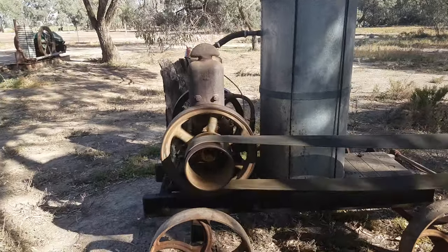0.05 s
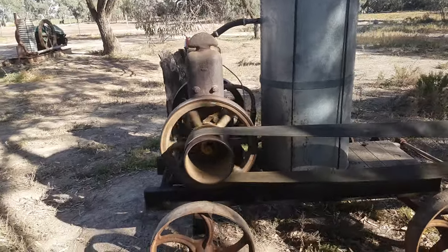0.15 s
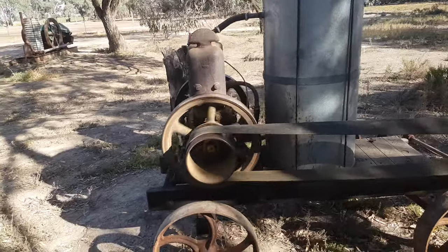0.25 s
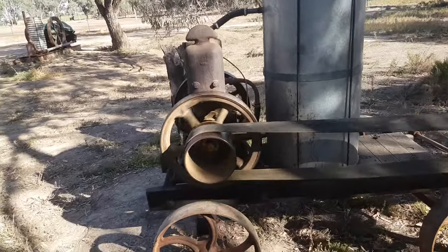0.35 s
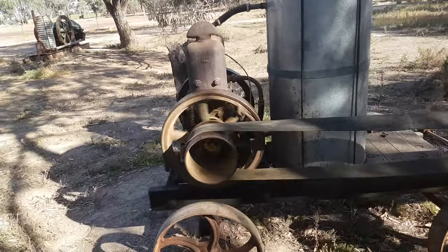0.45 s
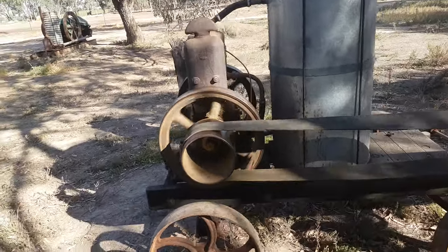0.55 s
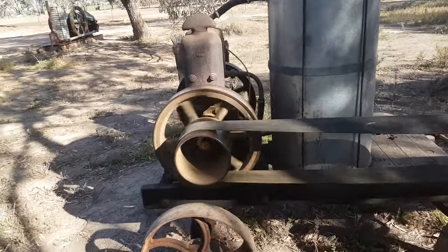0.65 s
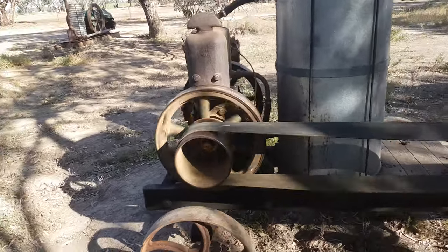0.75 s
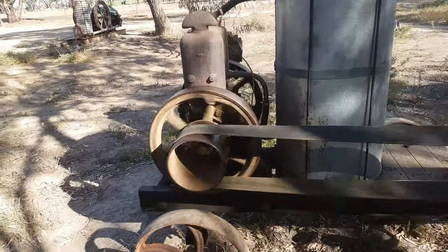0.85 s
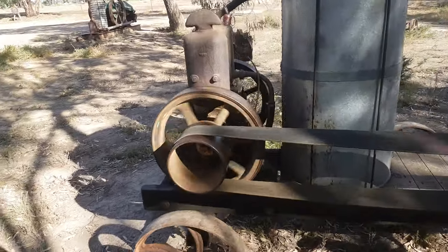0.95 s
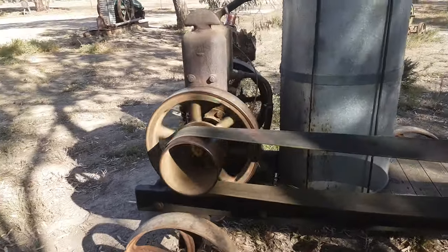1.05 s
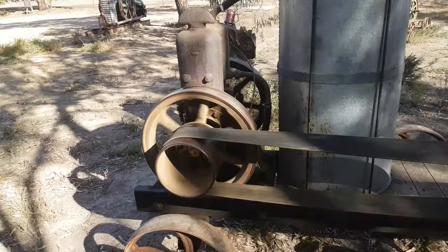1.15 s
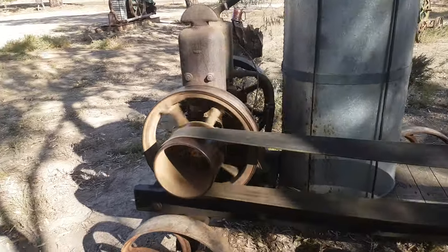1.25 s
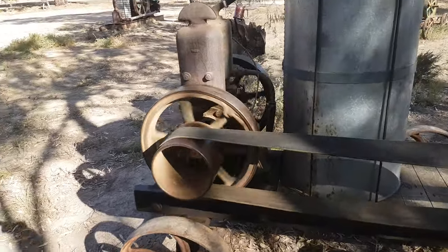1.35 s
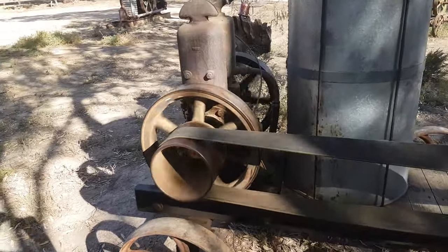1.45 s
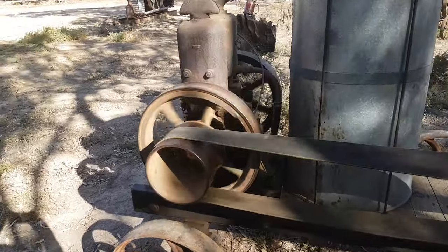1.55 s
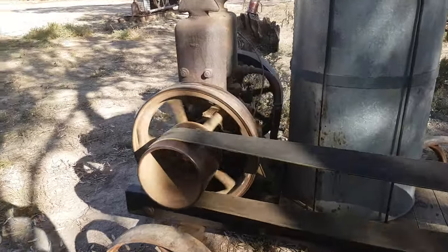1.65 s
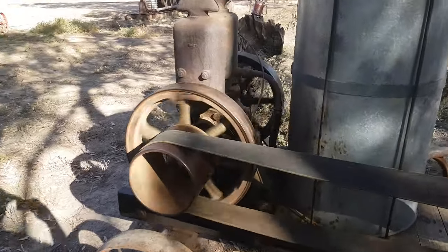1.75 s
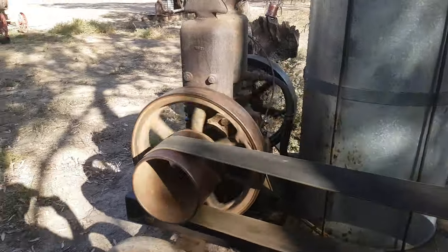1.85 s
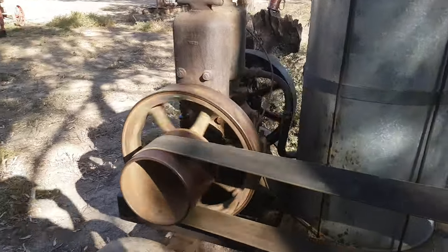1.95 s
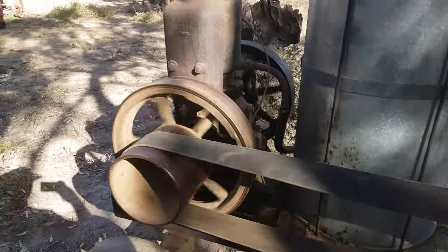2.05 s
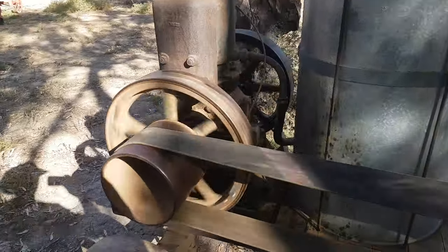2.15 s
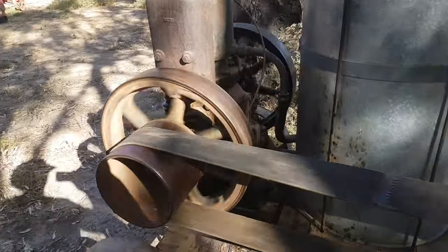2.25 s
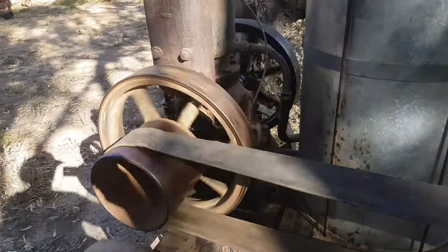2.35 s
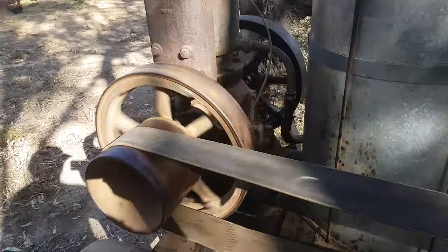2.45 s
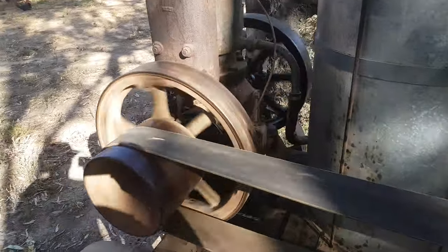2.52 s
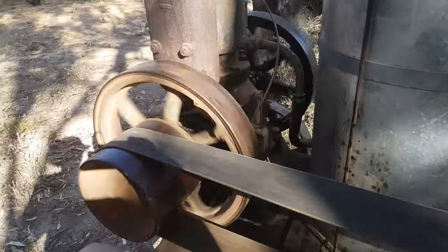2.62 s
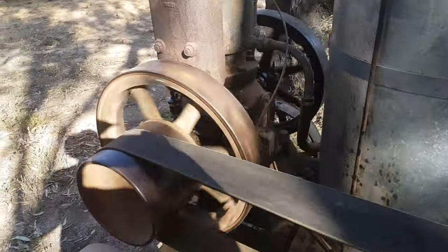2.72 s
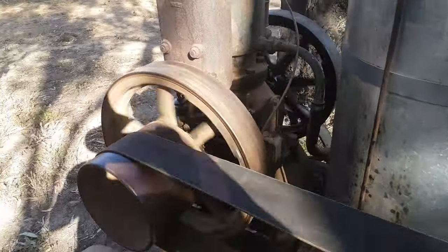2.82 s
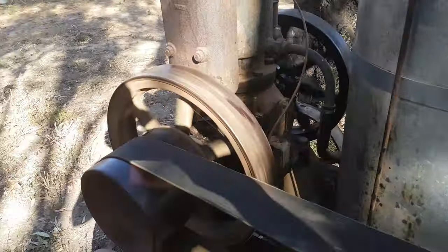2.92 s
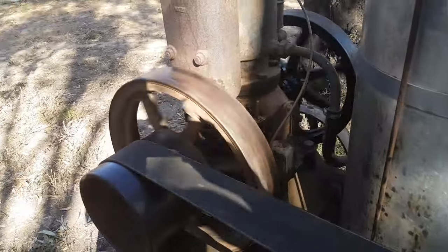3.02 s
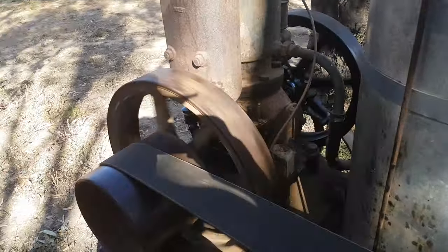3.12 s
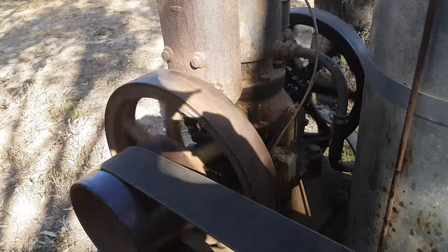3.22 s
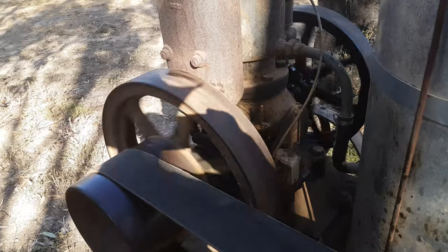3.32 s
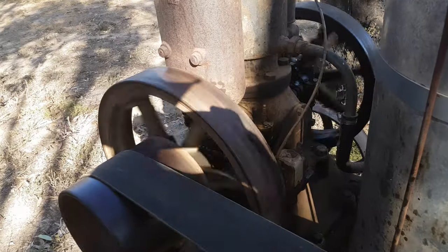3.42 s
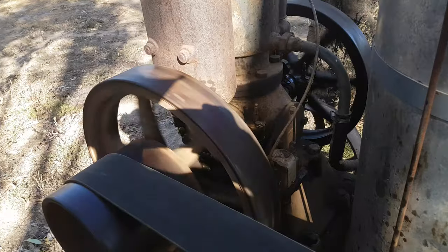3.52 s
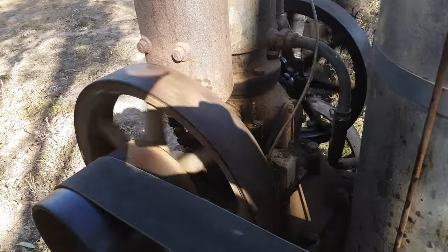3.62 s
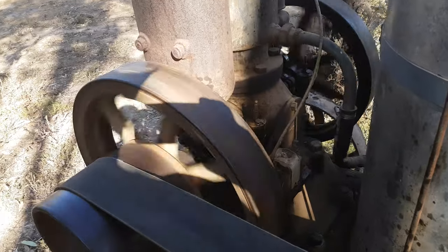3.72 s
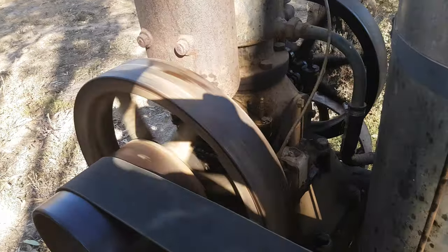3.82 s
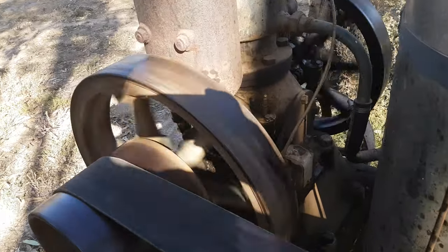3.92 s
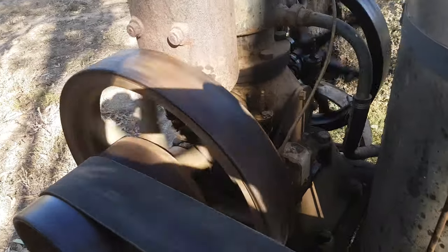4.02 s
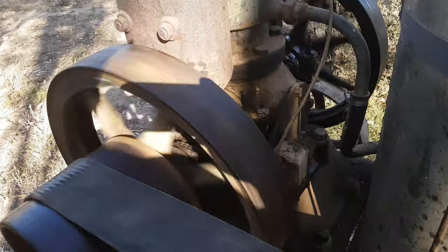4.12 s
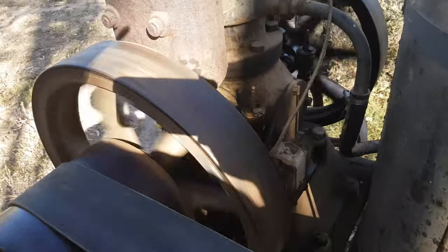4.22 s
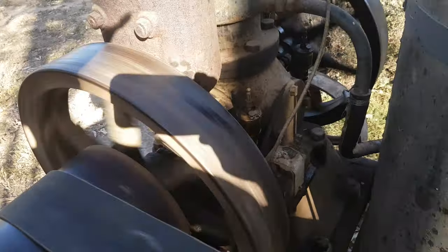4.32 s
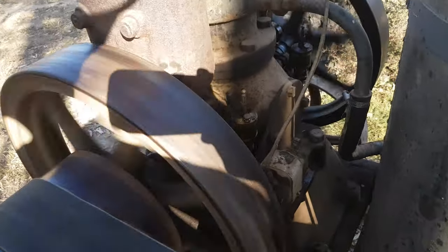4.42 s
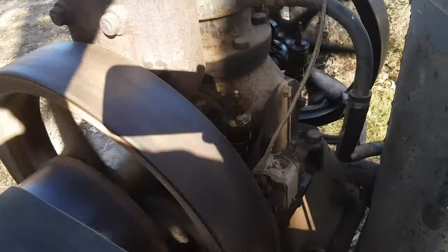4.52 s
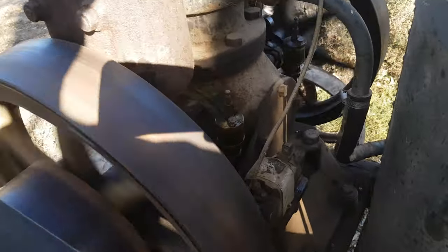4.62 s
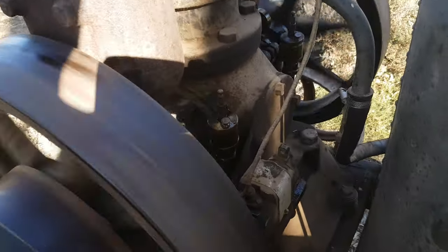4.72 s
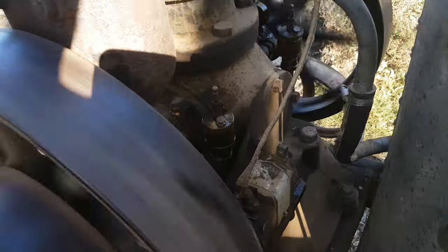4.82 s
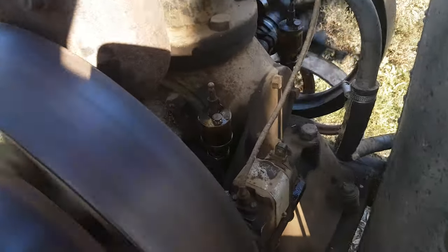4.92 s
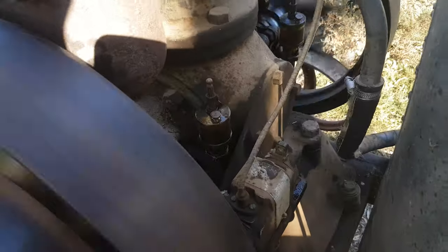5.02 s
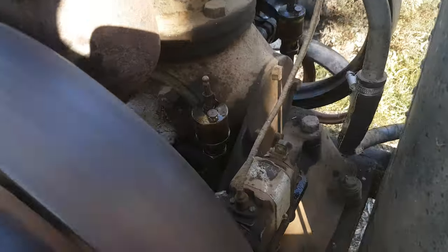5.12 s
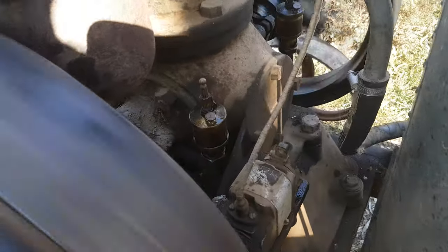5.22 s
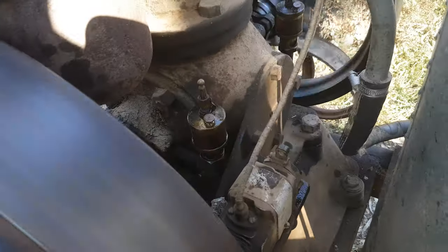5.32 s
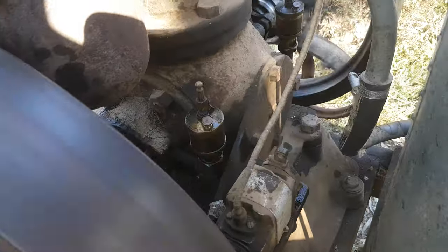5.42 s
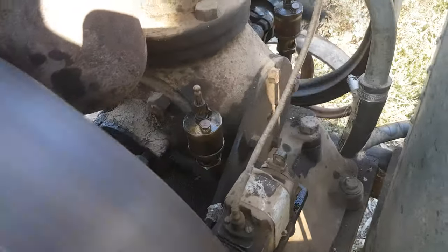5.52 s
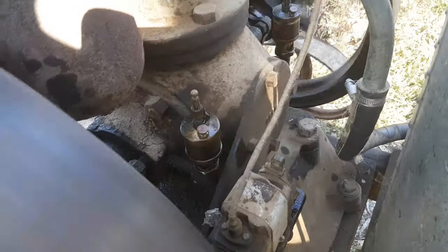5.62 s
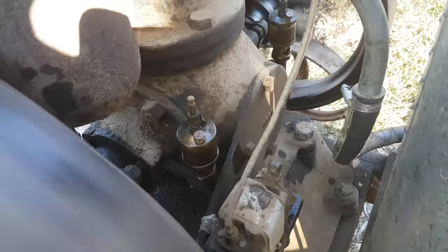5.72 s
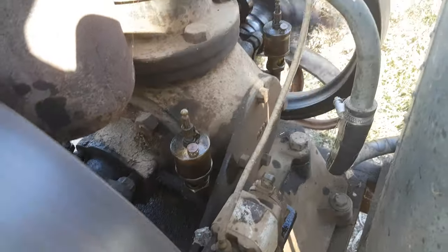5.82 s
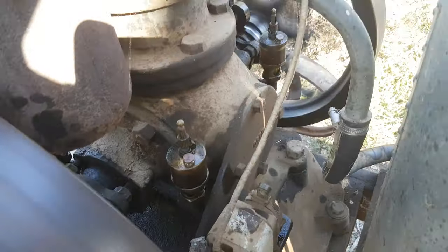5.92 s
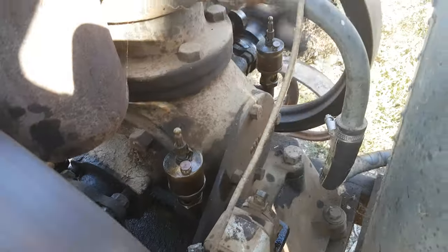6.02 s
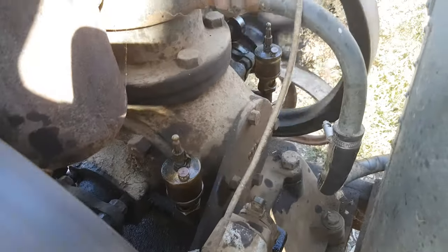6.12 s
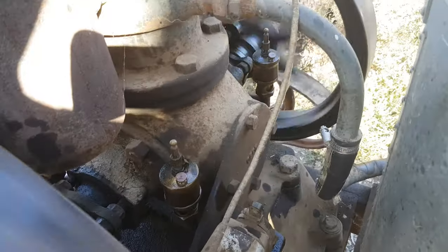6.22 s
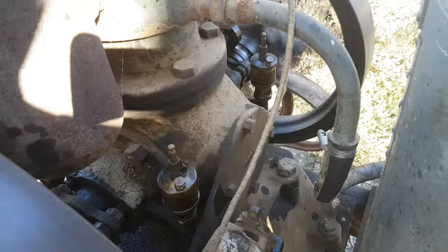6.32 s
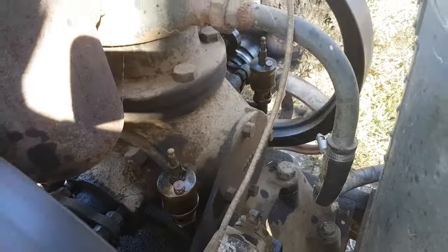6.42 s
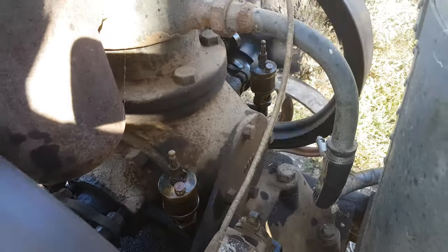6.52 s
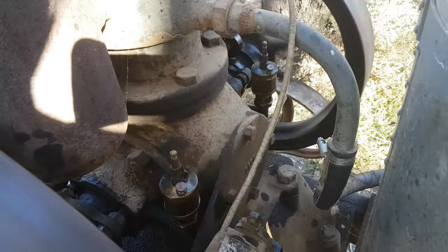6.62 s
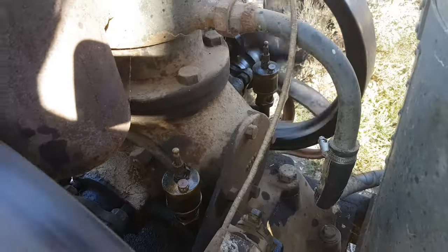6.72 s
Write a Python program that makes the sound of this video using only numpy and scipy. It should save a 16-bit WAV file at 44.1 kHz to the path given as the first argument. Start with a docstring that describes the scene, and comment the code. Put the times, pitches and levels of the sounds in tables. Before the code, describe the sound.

From the start an old single-cylinder two-stroke engine is already running outdoors, firing about 7.6 times a second and very slowly gaining speed. Each beat packs in a bright tick, a short gritty exhaust blast, a low thump with a hollow pipe ring, a hard knock, a crankcase thud, a bouncing valve snap and a loose clank, over continuous clatter and faint belt rumble. From 0 to 2.3 s the microphone approaches from three metres and the thumping swells. Around 2.3 s a loud clank and weak puff mark a misfire, with a small dip in speed. Flywheel ringing stands out near 2.5-3 s. By 3.6 s it is very close; a second misfire clanks about 4.1 s. From then the airy blast and hiss are duller, shaded behind the flywheel, while heavy low pounding dominates. A third, hardest clank comes near 6.5 s; the engine is still running at the end, 6.8 s.

```python
"""An old single-cylinder two-stroke engine runs in the open at about 470 turns a minute; a phone walks up close.
Each turn repeats a train: tick, exhaust blast with thump and pipe ring, knock, crankcase thump, a bouncing
valve and a loose clank, over steady clatter and belt rumble. Blows and noise excite damped resonances.
The speed creeps up, but three turns fail to fire: a loud clank, a weak exhaust and a drop in speed."""
import sys
import numpy as np
from scipy import signal
from scipy.io import wavfile
from scipy.ndimage import uniform_filter1d, map_coordinates

SR = 44100
rng = np.random.default_rng(int(sys.argv[2]) if len(sys.argv) > 2 else 0)


def nominal_scale(level):
    """Amplitude ratio for a level in decibels (scalar or array-like)."""
    x = np.asarray(level, float) / 20
    return 10 ** x


def dump_mix(stems):
    """Bounce the given channels to the path in sys.argv[1] as a 16-bit WAV at rate SR."""
    frames = np.atleast_2d(stems).T  # one column per channel
    limited = np.clip(frames, -1, 1)  # hard clip at full scale
    pcm = np.round(limited * 32767).astype(np.int16)
    wavfile.write(sys.argv[1], SR, pcm)


N = 298116

# The walk up to the engine. Each row: time in seconds, distance in metres.
DISTANCE = [(0, 3.2), (.6, 2.7), (1.2, 2.2), (1.9, 1.8), (2.4, 1.3), (3.1, 1.2), (3.6, .65), (4.2, .65),
            (5.2, .55), (6, .75), (6.76, .65)]
# The way round the engine, from the pulley end (0) to behind the flywheel (1).
# Each row: time in seconds, share of the way.
WAY_ROUND = [(0, 0.27), (1, 0.07), (2, 0.13), (2.6, 0.23), (3.3, 0.02), (3.7, 0.56), (4.3, 0.85), (5, 0.84),
             (5.6, 0.92), (6.76, 0.94)]
# Turns that fail to fire. Each row: time in seconds, speed lost in rpm, level of the clank in dB,
# level of the flywheel ring in dB.
MISFIRES = [(2.325, 14.055, -16, -21), (4.107, 13.39, -15, -24), (6.518, 12, -13, -32)]


def follow(table, t):
    """Linear interpolation: the second column of a table at times t."""
    return np.interp(t, *np.transpose(table))


def turns():
    """Rotation: the integral of shaft speed counts turns and so gives the moments of firing."""
    free_rpm, start_below_rpm, recover_s, first_turn_s = 492.885, 36.96, 2.8184, .0521
    t = np.arange(-SR // 5, N) / SR
    rpm = free_rpm - start_below_rpm * np.exp(-t / recover_s)
    for miss_s, lost_rpm, *_ in MISFIRES:
        rpm = rpm - lost_rpm * (t > miss_s) * np.exp(-np.maximum(t - miss_s, 0) / recover_s)
    done = np.cumsum(rpm) / SR / 60
    done = done - np.interp(first_turn_s, t, done)
    # one turn is already under way
    return np.interp(np.arange(-1, done[-1]), done, t)


def heard(part, t):
    """Distance law: a share of the 1 / r fall in pressure, and a change of level behind the flywheel."""
    # Each part's row: level in dB at 1 m, share of the 1 / r law that it follows, change in dB behind
    # the flywheel, random scatter in dB (rms, either sign).
    part_levels = {"thump": (-12, 1.02, 0, 0.2), "pipe": (-14.5, .6, -0.5, -0.4),
                   "crankcase": (-19, 1.2, 2, -0.9), "blast": (-16.5, -0.1, -10, 0.65),
                   "port": (-21, 0.6, -9.5, 1.1), "tick": (-29, 0.21, 0, .8), "knock": (-31, 0.1, 0.5, .7),
                   "valve": (-26, 0.56, -7, 0), "clank": (-33.5, 1.13, 2, 1.5),
                   "clatter": (-34.5, 0.52, -9.5, -1)}
    db, share, behind_db, scatter_db = part_levels[part]
    near_db = -20 * np.log10(follow(DISTANCE, t))
    scatter = scatter_db * rng.standard_normal(len(t))
    return db + share * near_db + behind_db * follow(WAY_ROUND, t) + scatter


def train(times, db, shape):
    """Convolution: one copy of a shape at each time, with its own level."""
    # a second of lead-in allows times before zero
    spikes = np.zeros(N + 2 * SR)
    np.add.at(spikes, np.round((times + 1) * SR).astype(int), nominal_scale(db))
    return signal.oaconvolve(spikes, shape)[SR:SR + N]


def fade(rise_ms, t60_ms):
    """Exponential growth and decay: a quick rise, then a fall by 60 dB in t60_ms; the top is 1."""
    ms = np.arange(SR // 4) * 1000 / SR
    rise = 1 - np.exp(-ms / max(rise_ms, .05))
    shape = rise * np.exp(-np.log(1000) * ms / t60_ms)
    return ms, shape / shape.max()


def rings(times, db, table, scatter_db=1.38):
    """Damped oscillation: low swings of air and iron, a little stronger or weaker from turn to turn."""
    out = 0
    for lag_ms, hz, rise_ms, t60_ms, mode_db, sign in table:
        ms, shape = fade(rise_ms, t60_ms)
        force_db = db + mode_db + scatter_db * rng.standard_normal(len(times))
        swing = sign * shape * np.sin(2 * np.pi * hz * ms / 1000)
        out = out + train(times + lag_ms / 1000, force_db, swing)
    return out


def pushes(times, db, table, scatter_db, slack_ms):
    """Impulsive excitation: blows as sharp contacts and as envelopes; play varies force and moment."""
    contacts, envelope = 0, 0
    for lag_ms, rise_ms, t60_ms, blow_db in table:
        # uniform draws with an rms of 1
        force, slip = rng.uniform(-np.sqrt(3), np.sqrt(3), (len(times), 2)).T
        when = times + (lag_ms + slack_ms * slip) / 1000
        force_db = db + blow_db + scatter_db * force
        contacts = contacts + train(when, force_db, np.hanning(5))
        envelope = envelope + train(when, force_db, fade(rise_ms, t60_ms)[1])
    return contacts, envelope


def patches():
    """Uneven excitation: a gain that wanders every 9 ms, mean power 1."""
    hold = int(9.0 * SR / 1000)
    steps = rng.uniform(-np.sqrt(3), np.sqrt(3), N // 100)
    wander = uniform_filter1d(np.repeat(steps, hold)[:N], hold // 2)
    gain = nominal_scale(4 * wander)
    return gain / np.sqrt(np.mean(gain ** 2))


def body(blows, modes, alike, firm_db, rattle_db, grain_db):
    """Modal resonance: clean contacts and a grainy rattle, partly alike in both microphones, drive the modes."""
    contacts, envelope = blows
    mid, side = rng.standard_normal((2, N))
    # the rattle changes strength every 48 samples
    grain_steps = nominal_scale(grain_db * np.minimum(rng.exponential(size=N // 48 + 1), 2))
    grains = np.repeat(grain_steps, 48)[:N]
    envelope = envelope * nominal_scale(rattle_db) * grains / np.sqrt(np.mean(grains ** 2))
    # alike is the correlation between left and right
    alike = np.clip(alike, 0, 1)
    rattle = np.sqrt((1 + alike) / 2) * mid + np.sqrt((1 - alike) / 2) * side * np.array([[1], [-1]])
    firm, loose = nominal_scale(firm_db) * contacts, envelope * rattle
    out = 0
    for hz, width, db in modes:
        # every mode is woken unevenly; the root evens out the noise power passed by its bandwidth
        force = firm + loose * patches()
        ring = signal.lfilter(*signal.iirpeak(hz, hz / width, SR), force)
        out = out + nominal_scale(db) * np.sqrt(SR / np.pi / width) * ring
    return out


def clatter(db):
    """Steady random excitation: gears, belt and bearings rattle on."""
    # Each row: frequency in Hz, bandwidth in Hz, level in dB.
    modes = [(742, 8, -14), (1114, 83, -8), (1285, 58, -1.5), (1588, 50, -2.5), (1970, 140, -6.5),
             (3060, 1300, -6), (3840, 420, -15), (5330, 1200, -7), (11500, 4500, 0), (273, 34, -2.5),
             (95, 200, -6.5)]
    return body((0, nominal_scale(db)), modes, alike=0.67, firm_db=0, rattle_db=1.0, grain_db=0.5)


def belt(db):
    """Broad resonance under steady noise: the belt rumbles."""
    # Each row: frequency in Hz, bandwidth in Hz, level in dB.
    modes = [(403, 150, 1.5), (544, 420, -11.5)]
    return body((0, nominal_scale(db)), modes, alike=1.0, firm_db=0, rattle_db=0, grain_db=7.0)


def tick(fire, db):
    """Impact on small stiff parts: a tick, further ahead of the exhaust when a turn takes over 0.127 s."""
    # Each row: milliseconds after the tick's reference moment, rise in ms, 60 dB decay in ms, level in dB.
    blows = [(-12.5, 0.31, 70, 3.5), (16.5, 0.2, 84, -1.5)]
    # Each row: frequency in Hz, bandwidth in Hz, level in dB.
    modes = [(3866, 340, 0), (2980, 310, -17), (6000, 2900, -32), (11000, 3000, -26)]
    # 0.85 s earlier per second of extra turn length
    times = fire - .85 * (np.gradient(fire) - .127)
    return body(pushes(times, db, blows, 1.2, .8), modes, alike=.45, firm_db=3, rattle_db=0, grain_db=1.5)


def exhaust_thump(fire, db):
    """Pulsed volume flow: each exhaust pulse sets low swings of air going."""
    # Each row: milliseconds after firing, frequency in Hz, rise in ms, 60 dB decay in ms, level in dB,
    # first swing out (1) or in (-1).
    swings = [(6.1, 96, 12, 32, -5.6, 1), (-1.9, 154, 12, 37, 0, 1), (-8.3, 84, 12, 67, -12, 1)]
    return rings(fire, db, swings)


def pipe_ring(fire, db):
    """Air-column resonance: the exhaust pipe rings after each pulse."""
    # Each row: milliseconds after firing, frequency in Hz, rise in ms, 60 dB decay in ms, level in dB,
    # first swing out (1) or in (-1).
    swings = [(-1.6, 284, 12, 76, -1.3, 1), (12.1, 303, 3, 56, 0, 1), (-1, 382, 7, 17, -5.4, 1),
              (44.3, 303, .5, 101, -14, 1)]
    return rings(fire, db, swings)


def exhaust_blast(fire, db):
    """Turbulent jet noise: a burst of gas, shaped by high resonances."""
    # Each row: milliseconds after firing, rise in ms, 60 dB decay in ms, level in dB.
    puffs = [(1.3, 0.91, 15.8, -1), (0.37, 0.42, 38.5, -4), (8, 0.18, 7, -21), (6.3, 3.0, 26, -9)]
    # Each row: frequency in Hz, bandwidth in Hz, level in dB.
    modes = [(4400, 20, -23), (5543, 190, -3.5), (6250, 460, -1.5), (6770, 240, -16.5), (5950, 2400, -8),
             (10500, 2260, -1), (12850, 5900, 1)]
    return body(pushes(fire, db, puffs, 1.2, .5), modes, alike=.3, firm_db=-3, rattle_db=0, grain_db=3.5)


def muffler(fire, db):
    """Shell resonance: gas blows make the muffler ring."""
    # Each row: milliseconds after firing, rise in ms, 60 dB decay in ms, level in dB.
    blows = [(0.527, 0.68, 40.4, 3), (13.1, 3.5, 40, -8.5), (42, 1.8, 28, -17.5)]
    # Each row: frequency in Hz, bandwidth in Hz, level in dB.
    modes = [(1529, 50, 2.5), (1424, 66, 1), (685, 230, -10.5)]
    return body(pushes(fire, db, blows, 1.0, 0.34), modes, alike=0.79, firm_db=11.0, rattle_db=-2, grain_db=4.0)


def frame(fire, db):
    """Structural resonance: blows within the turn make the frame ring."""
    # Each row: milliseconds after firing, rise in ms, 60 dB decay in ms, level in dB.
    blows = [(1.61, 0.4, 21, 0.5), (20.07, 0.61, 24, -8), (88, 0.86, 81, -5)]
    # Each row: frequency in Hz, bandwidth in Hz, level in dB.
    modes = [(737.6, 18.5, 1.5), (684, 54, -16)]
    return body(pushes(fire, db, blows, 3.0, .8), modes, alike=.85, firm_db=16, rattle_db=-6, grain_db=2.5)


def exhaust_port(fire, db):
    """Flow noise through an opening: puffs at the port excite its resonances."""
    # Each row: milliseconds after firing, rise in ms, 60 dB decay in ms, level in dB.
    puffs = [(3.95, 0.69, 16.6, 1.5), (12.3, 1.6, 33, -9), (23.8, 1.6, 23, -10)]
    # Each row: frequency in Hz, bandwidth in Hz, level in dB.
    modes = [(3060, 300, -12.5), (3770, 79, -9), (4200, 140, 2), (2850, 520, -5), (3100, 790, 0)]
    return body(pushes(fire, db, puffs, 1.27, 0.24), modes, alike=0.067, firm_db=2, rattle_db=0.0, grain_db=-3.0)


def knock(fire, db):
    """Impact of hard parts: firm contacts excite narrow modes."""
    # Each row: milliseconds after firing, rise in ms, 60 dB decay in ms, level in dB.
    blows = [(18.57, 0.27, 19, 2), (4.06, 0.26, 7.9, -7.5), (41.6, 0.83, 41, -7.5)]
    # Each row: frequency in Hz, bandwidth in Hz, level in dB.
    modes = [(966, 97, 2.5), (1340, 54, 0), (1510, 190, -11), (1890, 170, -16)]
    return body(pushes(fire, db, blows, 0.82, 0.82), modes, alike=0.94, firm_db=16.5, rattle_db=-2.5, grain_db=-4.0)


def water_tank_ring(fire, pipe_db):
    """Damped oscillation: a water tank nearby rings back near 250 and 289 Hz, thickening or thinning the pipe
    ring, at a level that changes."""
    # Each row: milliseconds after firing, frequency in Hz, rise in ms, 60 dB decay in ms, level in dB,
    # first swing out (1) or in (-1).
    swings = [(6, 250, 1.5, 61, -.5, 1), (11.8, 289, 12, 47, 0, -1)]
    # Each row: time in seconds, level in dB added to that of the pipe ring.
    added_level = [(0, 5.5), (1.8, -1), (2.3, -5), (2.8, -16), (3.4, -45), (4.2, -6.5), (5, -8.5),
                   (6.76, -6.5)]
    return rings(fire, pipe_db + follow(added_level, fire), swings)


def flywheel(fire, db):
    """Lightly damped modes: blows make the flywheel ring."""
    # Each row: milliseconds after firing, rise in ms, 60 dB decay in ms, level in dB.
    blows = [(88.5, 1.5, 40, 0), (47, 1.5, 30, -9), (19, .8, 20, -10)]
    # Each row: frequency in Hz, bandwidth in Hz, level in dB.
    modes = [(1159.4, 29.6, 2), (1190, 15, -25), (677, 33, -6)]
    return body(pushes(fire, db, blows, .8, .5), modes, alike=.9, firm_db=16, rattle_db=-3, grain_db=2.5)


def valve(fire, db):
    """Repeated impact: the crankcase valve snaps and bounces."""
    # Each row: milliseconds after firing, rise in ms, 60 dB decay in ms, level in dB.
    blows = [(42.06, 0.65, 42, 1.5), (52.5, 0.81, 34, -5.5), (65.6, 0.84, 55, -7), (19.8, 0.83, 53, -3.5)]
    # Each row: frequency in Hz, bandwidth in Hz, level in dB.
    modes = [(3630, 910, 0.5), (5300, 820, 0.5), (1850, 670, 1.5), (2460, 1500, -8.5), (10650, 2900, 0.5)]
    return body(pushes(fire, db, blows, 1.74, .7), modes, alike=0.096, firm_db=13, rattle_db=0, grain_db=-1.5)


def crankcase_thump(fire, db):
    """Damped air oscillation: the crankcase thumps, its first swing inward."""
    # Each row: milliseconds after firing, frequency in Hz, rise in ms, 60 dB decay in ms, level in dB,
    # first swing out (1) or in (-1).
    swings = [(38.6, 113, 12, 129, -3.7, -1), (39.8, 136, 2.4, 45, 0, -1)]
    return rings(fire, db, swings)


def clank(fire, db):
    """Impact across play: the slack linkage clanks near the top of the stroke."""
    # Each row: milliseconds after firing, rise in ms, 60 dB decay in ms, level in dB.
    blows = [(88, .8, 22, 0), (91.5, .8, 22, -9), (94, 1.5, 55, -13)]
    # Each row: frequency in Hz, bandwidth in Hz, level in dB.
    modes = [(2230, 30, -10), (2030, 110, 3), (716, 90, -11), (1250, 200, -11), (2750, 150, -18),
             (3200, 600, -22), (1750, 200, -12), (5500, 2500, -30)]
    return body(pushes(fire, db, blows, .6, .4), modes, alike=.6, firm_db=15, rattle_db=-5, grain_db=2.5)


def lean(x, lead_ms):
    """Interaural delay: the right microphone hears it a little later."""
    return np.array([x[0], map_coordinates(x[1], [np.arange(N) - lead_ms * SR / 1000], order=3)])


def scene():
    """Superposition: all parts add up, and all but the low swings reach the left microphone first."""
    # Levels of parts that turn towards or away from the listener. Each row: time in seconds, muffler ring
    # in dB, flywheel ring in dB, frame ring in dB, belt rumble in dB.
    facing = [(0, -28, -27, -28, -50), (.7, -23, -23, -26.5, -42.5), (1.7, -22, -27.5, -28, -43.5),
              (2.15, -20, -30, -22.5, -37.5), (2.5, -23.5, -18.5, -29, -37), (3, -24, -19.5, -37, -36),
              (3.2, -22.5, -28.5, -46, -37), (3.85, -22, -27, -50, -36), (4.1, -31, -33, -52, -41.5),
              (4.65, -29, -30, -31, -40.5), (4.9, -35, -43, -31, -39.5), (5.85, -30, -38, -38.5, -39.5),
              (6.1, -32, -47, -30.5, -38), (6.76, -24, -48, -25, -39.5)]
    t, fire = np.arange(N) / SR, turns()
    # travel time at 343 m/s
    fire = fire + follow(DISTANCE, fire) / 343

    thump_db, pipe_db, crank_db = (heard(part, fire) for part in ("thump", "pipe", "crankcase"))
    blast_db, port_db, tick_db = (heard(part, fire) for part in ("blast", "port", "tick"))
    knock_db, valve_db, clank_db = (heard(part, fire) for part in ("knock", "valve", "clank"))
    facing_s, *columns = np.transpose(facing)
    muffler_db, wheel_db, frame_db = (np.interp(fire, facing_s, c) for c in columns[:3])
    belt_db = np.interp(t, facing_s, columns[3])
    muffler_db = muffler_db + 1.4 * rng.standard_normal(len(fire))
    wheel_db = wheel_db + 1.4 * rng.standard_normal(len(fire))

    # the clank near the top of the stroke comes late in the turn before the unfired one
    miss_s, _, miss_clank_db, miss_wheel_db = np.transpose(MISFIRES)
    unfired = np.searchsorted(fire, miss_s)
    clank_db[unfired - 1], wheel_db[unfired - 1] = miss_clank_db, miss_wheel_db
    # the lean turn before a miss rings the muffler faintly
    muffler_db[unfired - 1] += -7
    thump_db[unfired] += -0.5
    # weak gas on the unfired turn, a stronger blast on the rich turn after it
    gas_db = np.zeros(len(fire))
    gas_db[unfired], gas_db[unfired + 1] = -10, 2
    blast_db, port_db = blast_db + gas_db, port_db + gas_db
    muffler_db = muffler_db + np.minimum(gas_db, 0)

    low = exhaust_thump(fire, thump_db) + pipe_ring(fire, pipe_db)
    low = low + water_tank_ring(fire, pipe_db) + crankcase_thump(fire, crank_db)
    high = clatter(heard("clatter", t)) + belt(belt_db)
    high += exhaust_blast(fire, blast_db) + muffler(fire, muffler_db) + frame(fire, frame_db)
    high += knock(fire, knock_db) + flywheel(fire, wheel_db) + clank(fire, clank_db)
    treble = tick(fire, tick_db) + exhaust_port(fire, port_db) + valve(fire, valve_db)

    # the left side leads by much more behind the flywheel
    lead_ms, lead_behind_ms, lead_bend = 0.052, 0.32, 2.56
    behind = np.clip(follow(WAY_ROUND, t), 0, 1) ** lead_bend
    lead_ms = lead_ms + (lead_behind_ms - lead_ms) * behind
    # treble bends round the phone's body, so its lead is never under 0.24 ms
    return low + lean(high, lead_ms) + lean(treble, np.maximum(lead_ms, 0.24))


def colour(x, points):
    """Linear filtering: a short symmetric filter through (Hz, dB) points."""
    hz = np.linspace(0, SR / 2, 1025)
    points_hz, points_db = np.transpose(points)
    db = np.interp(np.log(hz + 1), np.log(points_hz), points_db)
    return signal.fftconvolve(x, signal.firwin2(1023, hz, nominal_scale(db), fs=SR), "same")


def low_pass(x):
    """Removes everything above the highest recorded frequency."""
    return signal.sosfilt(signal.butter(12, 16980, fs=SR, output="sos"), x)


def record(dry):
    """Transducer response: two small microphones, a dip near 8.6 kHz, peaks clipped at full scale."""
    # Response of both microphones. Each row: frequency in Hz, gain in dB.
    response = [(20, -13), (35, 5.5), (60, 1), (6800, -2.5), (7600, -7.5), (8600, -12), (9600, -7),
                (10400, -5), (15500, -15), (17000, -50)]
    # Each row: frequency in Hz, left minus right in dB.
    sides = [(60, -1), (110, -3), (200, -2.5), (380, -3.5), (700, -4), (1290, -3.5), (2380, -1), (4400, -3),
             (8120, 4.5), (15000, -12.5)]
    left = colour(colour(dry[0], response), [(hz, db / 2) for hz, db in sides])
    right = colour(colour(dry[1], response), [(hz, -db / 2) for hz, db in sides])
    mix = np.clip([left, right], -1, 1)
    return low_pass(mix)


dry = scene()
out = record(dry)
dump_mix(out)
```